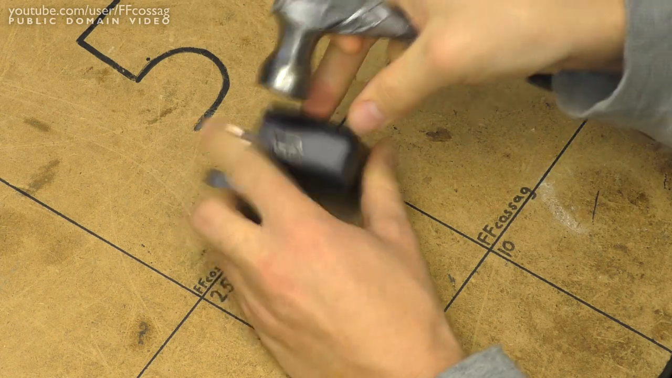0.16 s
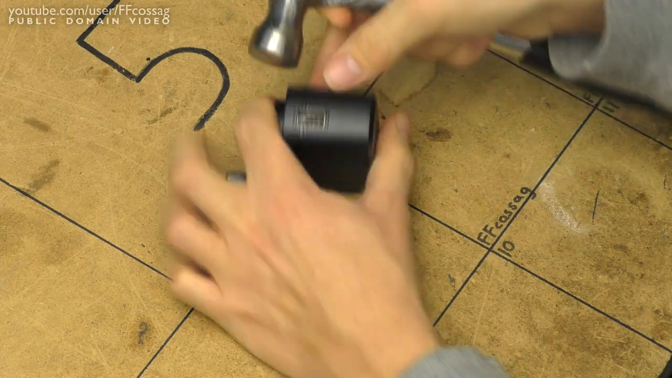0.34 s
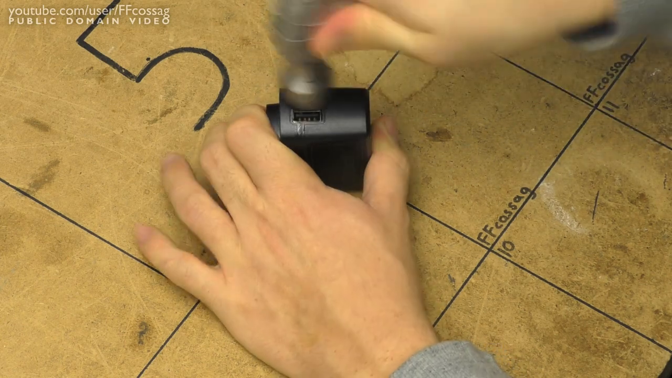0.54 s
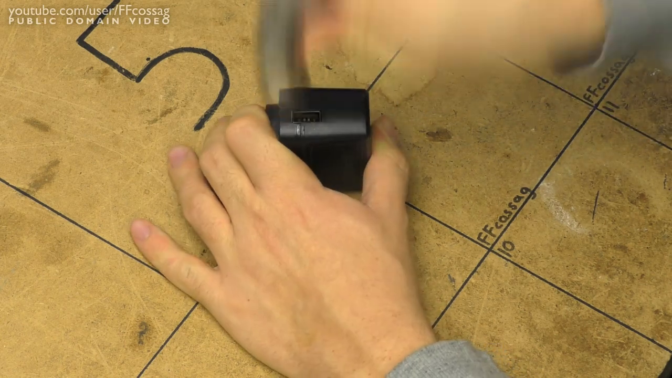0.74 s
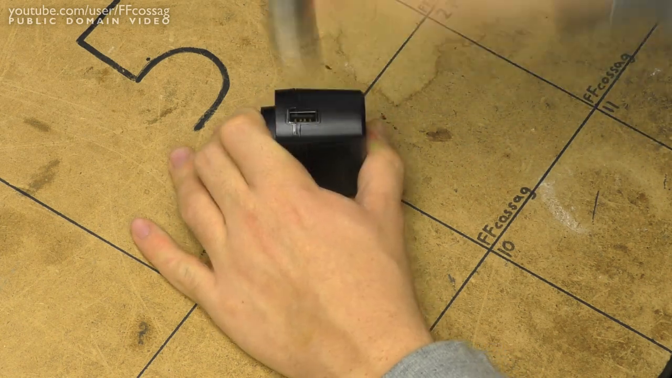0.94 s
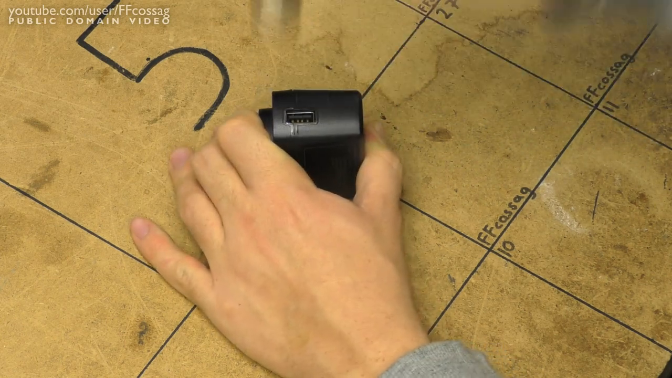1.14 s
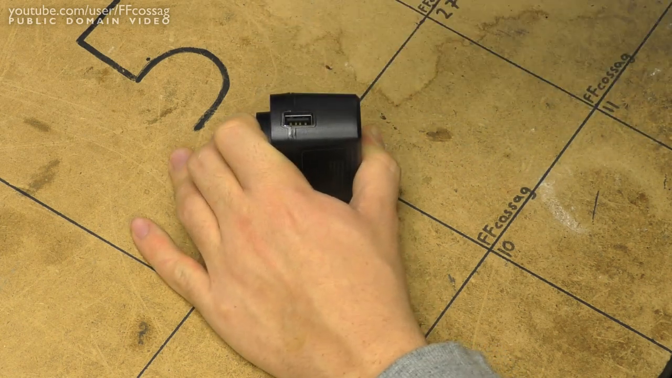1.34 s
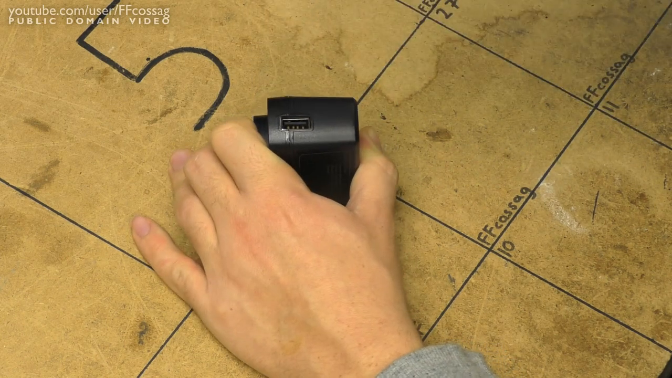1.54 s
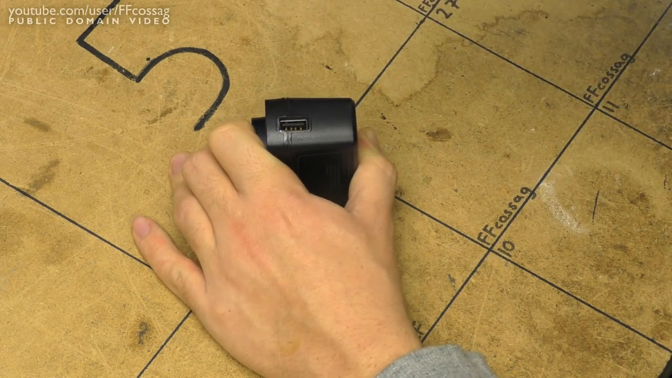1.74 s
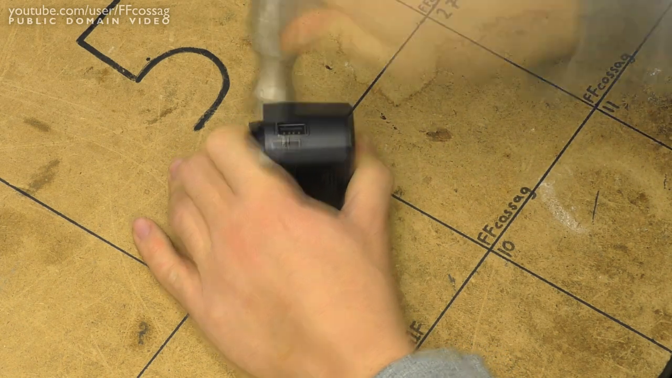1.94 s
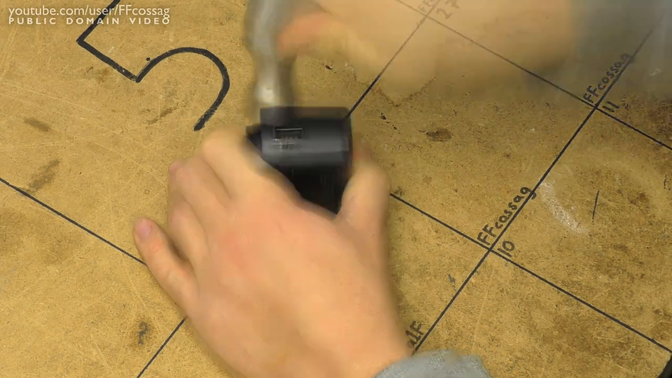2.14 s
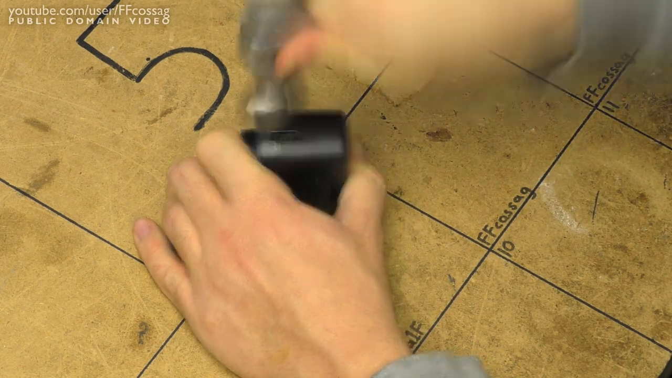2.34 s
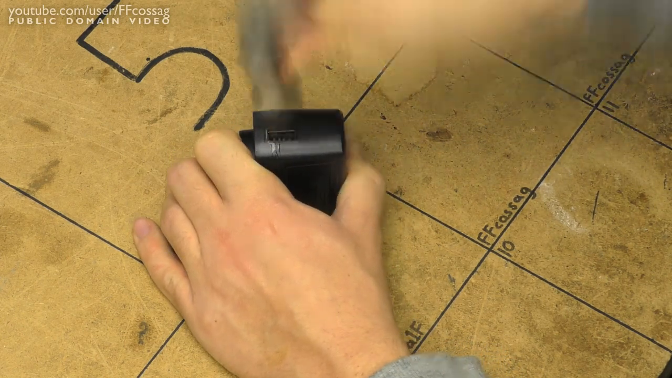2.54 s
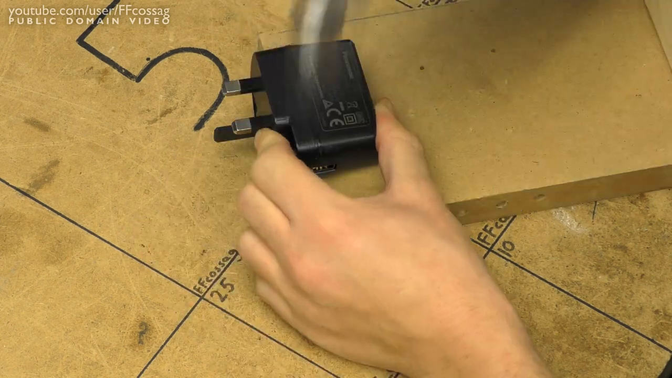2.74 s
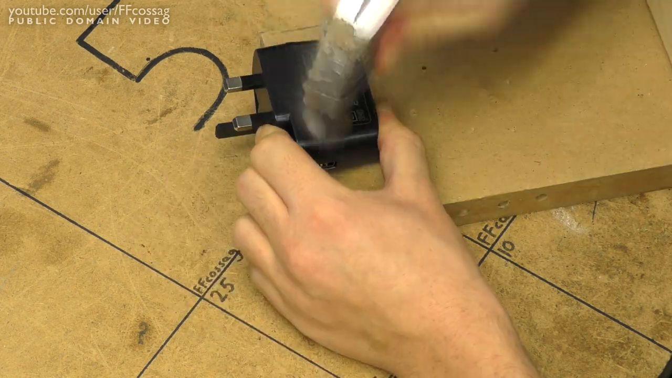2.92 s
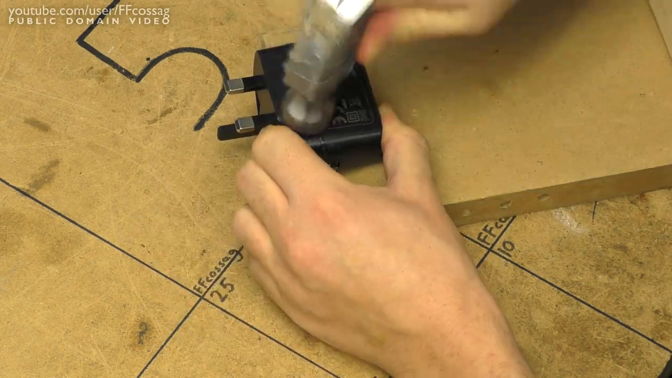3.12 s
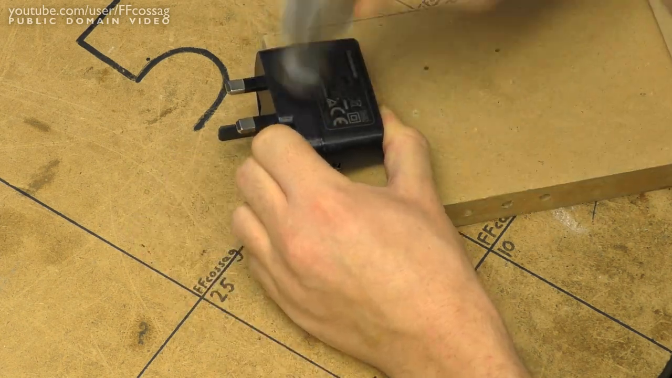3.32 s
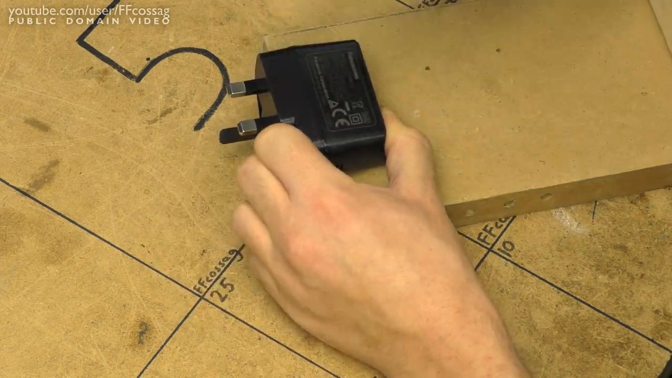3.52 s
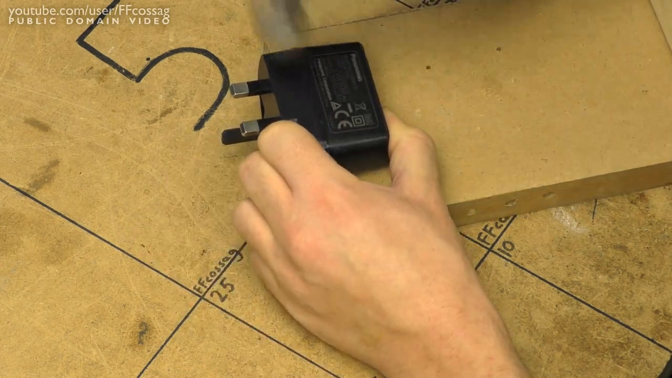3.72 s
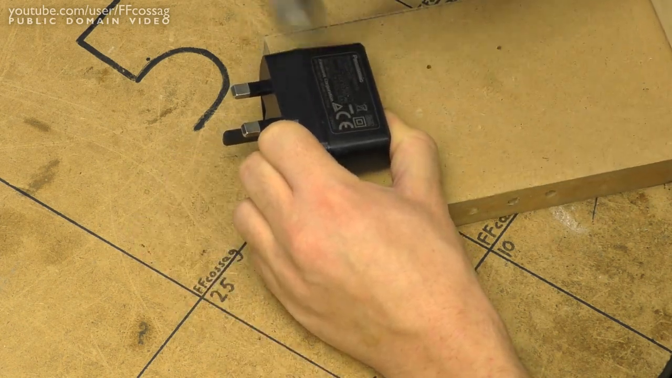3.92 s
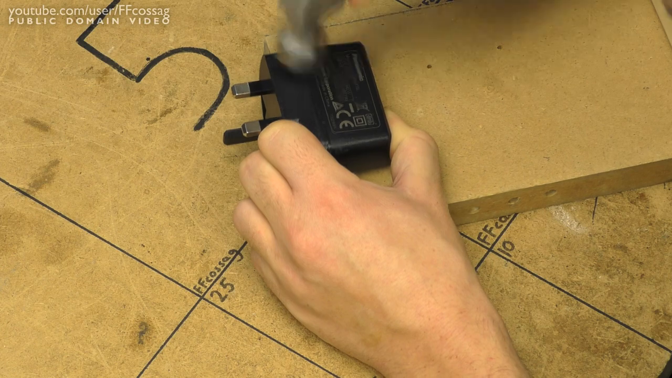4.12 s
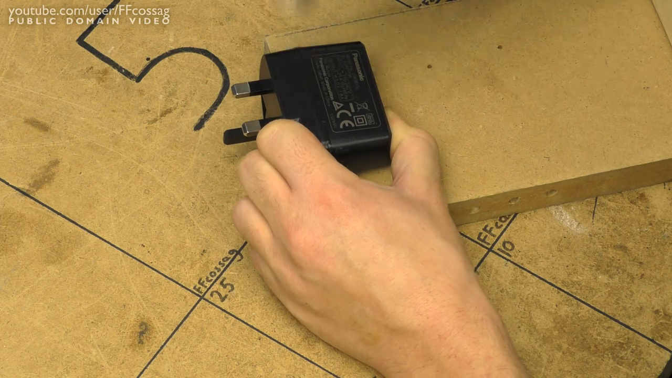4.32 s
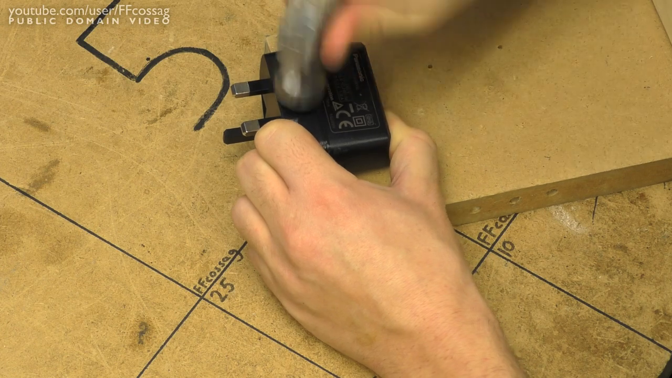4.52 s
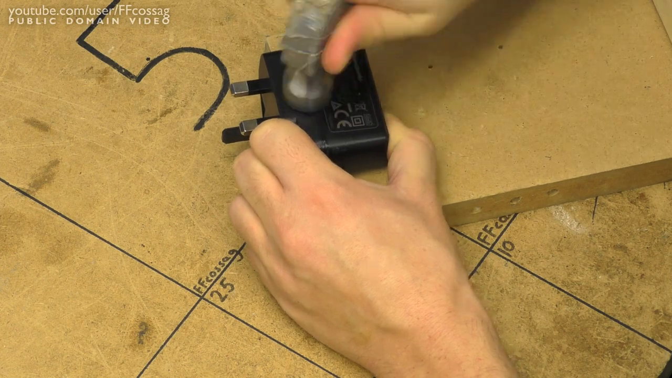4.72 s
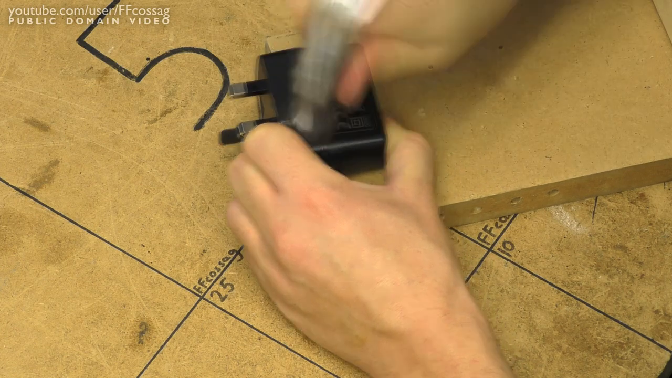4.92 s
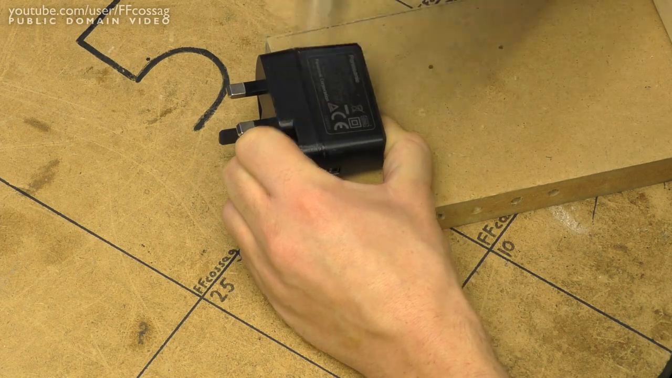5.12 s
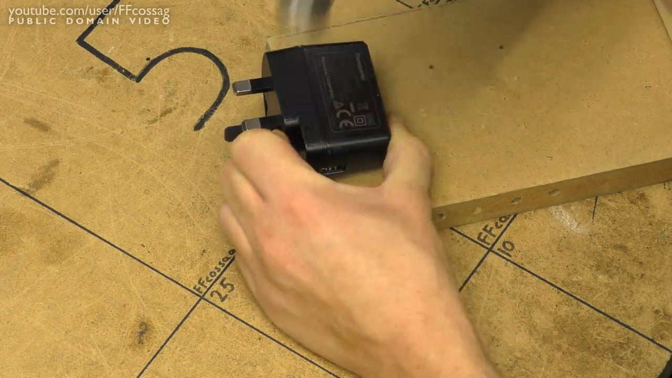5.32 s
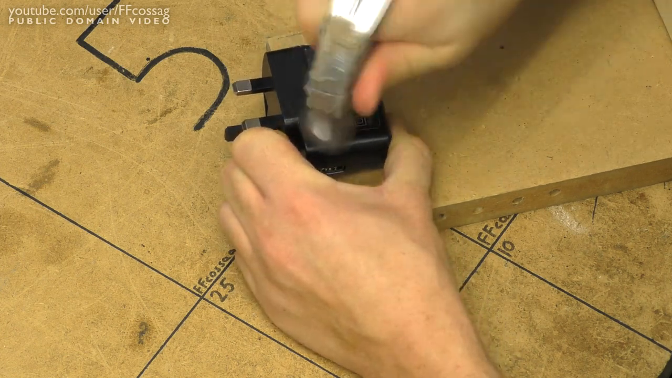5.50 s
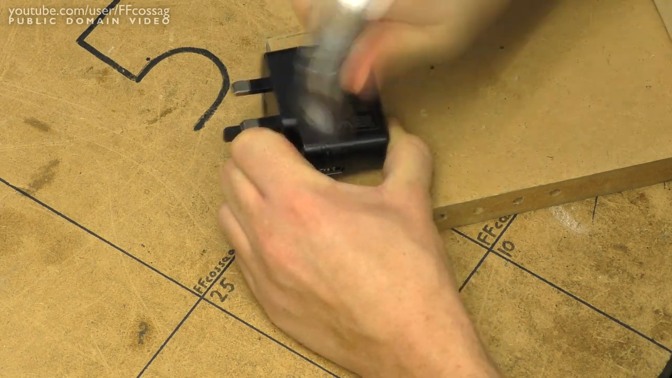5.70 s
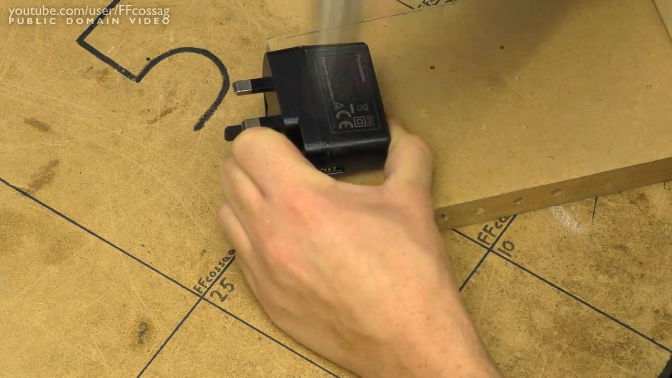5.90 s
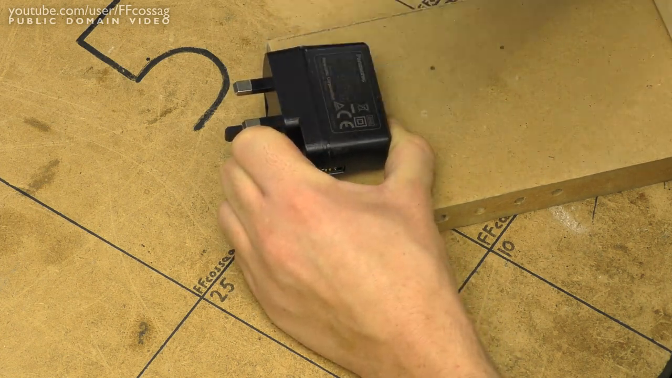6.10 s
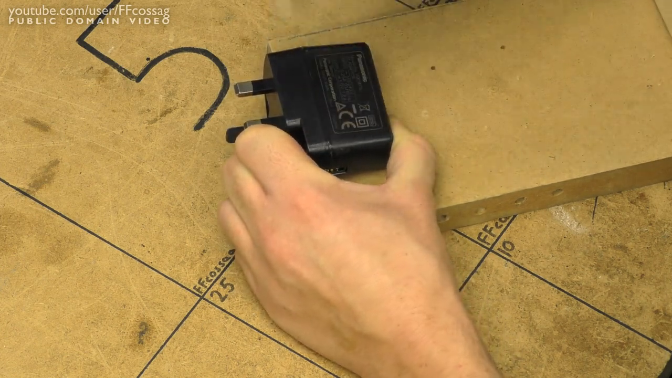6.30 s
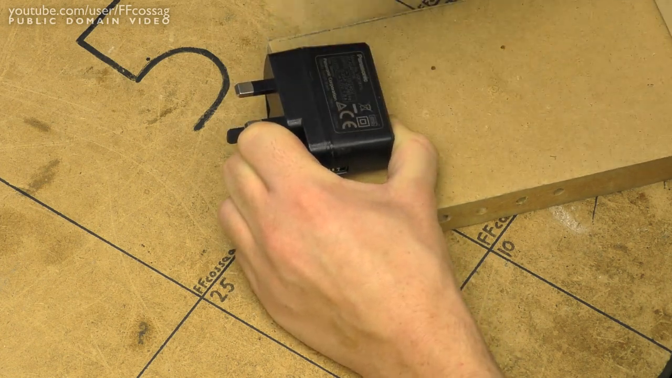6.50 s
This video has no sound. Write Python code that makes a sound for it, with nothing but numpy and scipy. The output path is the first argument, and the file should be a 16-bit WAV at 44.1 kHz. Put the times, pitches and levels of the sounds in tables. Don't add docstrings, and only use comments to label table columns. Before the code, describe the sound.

Rapid sped-up hammering on hollow hard plastic, about ten sharp blows a second, with woody thumps, loose rattle and brief pauses in a small room.

```python
import sys
import numpy as np
from scipy import signal
from scipy.fft import rfft, irfft
from scipy.io import wavfile
from scipy.ndimage import uniform_filter1d

SR = 44100
rng = np.random.default_rng(int(sys.argv[2]) if len(sys.argv) > 2 else 0)


def invert_db(level):
    return 10 ** (np.asarray(level, dtype=float) / 20)


def dump_mix(stems):
    frames = np.atleast_2d(stems).T
    limited = np.clip(frames, -1, 1)
    pcm = np.round(limited * 32767).astype(np.int16)
    wavfile.write(sys.argv[1], SR, pcm)


N = 288855

# f/Hz, level/dB, t60/s
CASE_MODES = [
    [(804, -28, 0.025), (1036, -26.5, 0.032), (1310, -25.5, 0.026), (600, -35, 0.035), (1590, -27, 0.013),
     (1826, -19.5, 0.0086), (2270, -20.5, 0.0091), (3180, -33.5, 0.024)],
    [(972, -31.5, 0.019), (1220, -32, 0.017), (1817, -28.5, 0.01), (2210, -35.5, 0.0083),
     (3034, -35, 0.028), (3695, -39, 0.025)],
]
# f/Hz, width/Hz, level/dB
CRACK_BANDS = [
    [(1450, 1200, -23.5), (5170, 1900, -30), (7940, 2000, -22.5), (13500, 2600, -33.5)],
    [(1150, 1000, -25), (3000, 1100, -26), (6850, 2130, -23.5), (12530, 2900, -35)],
]
BUZZ_SHARE = [.12, .22]
STEEL_HZ = [
    [7672, 815],
    [3720, 6900, 7610, 8650, 10050],
]
# level/dB, t60/s
STEEL_DECAY = [
    [(-64, .4), (-57, .4)],
    [(-50, .2), (-56, .2), (-58, .25), (-55, .18), (-55, .2)],
]
BENCH_HZ = [56, 119, 131, 177, 251, 305, 378, 555]
# level/dB, t60/s
BENCH_DECAY = [
    [(-40, 0.81), (-31, 0.42), (-40, 0.34), (-48, 0.7), (-43, 0.35), (-45, 0.55), (-41.5, 0.2), (-48, 0.12)],
    [(-39, 0.85), (-30, 0.52), (-37, 0.54), (-46, 0.7), (-45.5, 0.45), (-50, 0.6), (-44, 0.21),
     (-75.5, 0.092)],
]
# f/Hz, level/dB, t60/s
TOP_SHOVE = (155.4, -18, 0.029)
# f/Hz, width/Hz, level/dB
BOUNCE_BANDS = [(700, 650, -3), (1360, 450, -3), (1850, 630, -.5), (2500, 750, -6), (3900, 1800, -17),
                (7500, 4000, -21)]
# f/Hz, level/dB, t60/s
ROOM_DECAY = [(210, -37, 0.93), (645, -23.5, 0.13), (1500, -25, 0.12), (3000, -38, 0.2),
              (5000, -43.5, 0.17), (8000, -40.5, 0.13), (13000, -50, 0.07), (16100, -80, .04)]
# f/Hz, level/dB per Hz
AIR_SPECTRUM = [(15, -39), (25, 6.5), (65, 16.5), (202, 8.5), (266, 8.5), (902, -15), (1220, -8.5),
                (2820, -23.5), (7300, -31), (11300, -40.5), (13600, -45.5), (16500, -83)]
# t/s of the first copy, crack level/dB, share of the first copy (0-1),
# bench top level/dB, bounce level/dB
STANDING_BLOWS = [(-0.0025, -5.0, 0.38, 2.0, -5.5), (0.5465, -7.0, 0.35, 0.5, -10.0),
                  (0.6367, -4.5, 0.13, 7.0, -7.0), (0.7353, -5.0, 0.9, 7.5, -7.5),
                  (0.828, -0.5, 0.31, 3.5, -5.5), (0.9174, -4.5, 0.09, 1.5, -6.5),
                  (1.0155, -1.5, 0.14, 4.0, -5.5), (1.1203, -2.5, 0.9, 5.5, -4.5),
                  (1.2062, -4.5, 0.11, -0.5, -8.5), (1.3139, -3.0, 0.73, 1.5, -6.5),
                  (1.4057, -3.5, 0.17, 2.5, -4.5), (1.5023, -1.0, 0.18, 4.0, -7.5),
                  (1.6059, -2.5, 0.57, 0.5, -8.0), (1.7056, -4.5, 0.82, 2.5, -6.5),
                  (1.793, -1.5, 0.34, 4.0, -5.5), (1.8868, -2.0, 0.21, -2.0, -5.5),
                  (1.991, -3.5, 0.93, -1.5, -7.5), (2.0863, -3.5, 0.65, 3.5, -6.0),
                  (2.191, -1.0, 0.98, -3.5, -8.0), (2.2846, -3.0, 0.95, 2.5, -11.0),
                  (2.3643, -3.5, 0.14, 3.0, -2.0), (2.4598, -0.5, 0.14, -1.0, -18.5),
                  (2.556, -3.5, 0.15, 2.0, -11.5)]
FLAT_BLOWS = [(2.7947, -4.0, 0.29, -1.0, 1.0), (2.9022, -1.0, 0.11, 1.0, 8.5),
              (3.0158, -3.5, 0.15, 3.5, 9.0), (3.1297, -3.0, 0.24, 0.0, 4.5),
              (3.2554, -3.0, 0.93, 2.5, 3.0), (3.3553, -0.5, 0.11, -4.0, 6.5),
              (3.4774, -0.5, 0.59, 6.5, 5.5), (3.5931, -2.0, 0.81, 4.0, 6.0), (3.7042, -2.0, 0.4, 7.0, 2.5),
              (3.8306, -1.5, 0.93, 2.0, 9.5), (3.9349, -1.0, 0.48, -3.0, 0.0),
              (4.0516, -2.0, 0.77, 3.5, 2.0), (4.1483, -1.5, 0.08, 4.0, -0.5)]
LAST_FLAT_BLOWS = [(4.405, -2.0, 0.86, 4.5, 6.5), (4.5156, -0.5, 0.8, -5.5, 1.0),
                   (4.624, -0.5, 0.31, 0.5, 3.0), (4.7319, -1.0, 0.12, 0.0, 8.5),
                   (4.8506, -1.5, 0.42, -1.0, 4.5), (4.9546, -2.5, 0.1, -7.5, 3.0),
                   (5.0631, -5.0, 0.15, -5.5, 4.0), (5.1807, -1.0, 0.35, -3.0, 2.5),
                   (5.287, 0.5, 0.16, -2.5, 8.5), (5.3967, -1.5, 0.08, 0.0, 6.0),
                   (5.505, 0.0, 0.14, -1.5, 8.0), (5.63, 0.5, 0.98, -0.5, 10.5),
                   (5.74, -1.0, 0.94, -1.5, -4.0), (5.8407, -1.0, 0.66, 2.0, 2.0),
                   (5.951, -0.5, 0.24, -2.5, 1.0), (6.0633, 1.0, 0.28, 2.0, 1.0),
                   (6.17, -2.5, 0.26, -2.5, 3.5), (6.2916, -1.0, 0.82, -4.0, 3.5),
                   (6.372, -2.0, 0.47, -0.5, -5.0), (6.4395, -3.0, 0.76, 0.0, -2.0),
                   (6.5005, -3.0, 0.81, -6.5, 1.5)]
# legs level/dB at the start, legs drift/dB per s, steel level/dB, bounce delay/s
RUN_SETTINGS = [
    (2.5, -.8, -2.5, .105),
    (6, -6, 1.5, .085),
    (11, -6, 1, .082),
]
# t/s, level/dB, f/Hz, length/s
FINGER_KNOCKS = [(.112, -54, 600, .02), (.1295, -31, 430, .008), (.13, -42, 1400, .01),
                 (.137, -38, 330, .02), (.15, -47, 170, .045), (.197, -49, 280, .025),
                 (.203, -64, 1300, .015), (.274, -66, 1600, .013), (.391, -66.5, 1210, .04),
                 (3.622, -41, 1500, .005), (4.2, -60, 160, .07), (4.332, -59, 2600, .004),
                 (5.91, -44, 1800, .018)]
# t/s, level/dB, f/Hz,
# length/s
PRONG_TICKS = [(.148, -60, 8000, .004), (.193, -75, 6300, .026), (.272, -69, 7550, .004),
               (.364, -73, 6960, .05), (2.028, -64, 7400, .03), (2.061, -60, 7400, .004),
               (2.666, -74, 6900, .03), (2.7, -77, 7450, .021), (2.749, -62, 5670, .003),
               (4.2, -71, 5000, .09), (4.332, -66, 7500, .003), (4.253, -66, 8000, .008),
               (4.269, -56.5, 7000, .006), (4.286, -66, 6500, .006), (4.6, -60, 7000, .025),
               (5.276, -52, 6000, .025), (5.907, -44, 6000, .02)]

HOP = 706
RING = 20 * HOP
SLICE = .84
OVERLOAD_DB = -25
SURGE_DB, SURGE_S = 7, .0025
HIT_COLOUR_DB = 1.5
BOUNCE_DB, BOUNCE_S = -59.5, .034
LEAD_IN = 1.5
FLIGHT_S_PER_DB = .002
SWAY_BUILD_DB, SWAY_BUILD_S, SWAY_RISE_S = -4.5, .12, .025
KNOCK_WIDTH, TICK_WIDTH = 1.0, .6
AIR_DB, STIR_DB, SETTLE_S = -55.5, 6, .15
HISS_DB, DUCK_DB, RECOVER_S = -78, -10, .12


def hammering():
    mix = np.zeros(N + RING)
    noise = rng.standard_normal(N + 2 * RING)
    rattle = sum(invert_db(db) * resonate(np.roll(noise, round(hz)), hz, width)
                 for hz, width, db in BOUNCE_BANDS)
    rattles = [1.4 * uniform_filter1d(rattle, size=14), rattle]
    runs = (STANDING_BLOWS, FLAT_BLOWS, LAST_FLAT_BLOWS)
    for k, (blows, (legs_db, drift, steel_db, delay)) in enumerate(zip(runs, RUN_SETTINGS)):
        flat = min(k, 1)
        for s, crack_db, share, top_db, bounce_db in blows:
            since = s - blows[0][0]
            sway_db = legs_db + drift * since + SWAY_BUILD_DB * np.exp(-since / SWAY_BUILD_S)
            bounce_s = delay + FLIGHT_S_PER_DB * bounce_db
            own_rattle = rattles[flat][RING + round(s * SR):][:RING]
            sound = blow(flat, own_rattle, crack_db, top_db, sway_db, bounce_s, bounce_db, steel_db)
            add(mix, s - 2 * HOP / SR, speed_up(sound, share))
    return mix[RING:]


def blow(flat, rattle, crack_db, top_db, legs_db, bounce_s, bounce_db, steel_db):
    t = np.arange(RING) / SR
    noise, stray = rng.standard_normal((3, RING)), rng.standard_normal((4, 2, 8))
    near = reflections(t, noise[1])
    near[:5 * HOP] += case_body(flat, t[:5 * HOP], stray[0])
    near[:HOP] += crack(flat, t[:HOP], noise[0, :HOP], stray[3, 0])
    pressure = invert_db(crack_db) * near + bench(flat, t, stray[1], legs_db, top_db)
    pressure += rattle * chatter(t, noise[2], bounce_s, bounce_db)
    pressure += invert_db(steel_db) * steel(flat, t, stray[2])
    pressure *= invert_db(SURGE_DB * np.exp(-t / SURGE_S))
    pressure[-HOP:] *= np.linspace(1, 0, HOP)
    return np.clip(pressure, -invert_db(OVERLOAD_DB), invert_db(OVERLOAD_DB))


def crack(flat, t, noise, colour):
    contact = np.exp(-(t / .0017) ** 2) + BUZZ_SHARE[flat] * np.exp(-t / .006)
    bands = sum(invert_db(db + HIT_COLOUR_DB * c) * resonate(noise, hz, width)
                for (hz, width, db), c in zip(CRACK_BANDS[flat], colour))
    return bands * contact


def case_body(flat, t, stray):
    modes = np.array(CASE_MODES[flat])
    return ring(modes[:, 0], modes[:, 1:], t, stray * [[3], [1.5]]).sum(0)


def bench(flat, t, stray, legs_db, top_db):
    legs, *top = ring(BENCH_HZ, BENCH_DECAY[flat], t, stray * [[3], [1.5]], start=2.2)
    sound = invert_db(legs_db) * legs * (1 - np.exp(-t / SWAY_RISE_S))
    sound += invert_db(top_db) * sum(top) * (1 - np.exp(-t / 0.0027))
    early = t[:5 * HOP]
    shove = ring(TOP_SHOVE[:1], [TOP_SHOVE[1:]], early, stray * [[5], [1]], start=.5)[0]
    sound[:5 * HOP] += shove * (1 - np.exp(-early / .0004))
    return sound


def chatter(t, noise, bounce_s, bounce_db):
    spread = BOUNCE_S * np.where(t < bounce_s, LEAD_IN, 1)
    uneven_db = 3.0 * evened(uniform_filter1d(noise, 150))
    return np.exp(-((t - bounce_s) / spread) ** 2) * invert_db(BOUNCE_DB + bounce_db + uneven_db)


def steel(flat, t, stray):
    tones = ring(STEEL_HZ[flat], STEEL_DECAY[flat], t, stray * [[.3 * flat], [2 + 3 * flat]])
    return tones.sum(0) * (1 - np.exp(-t / (.03 + .03 * flat))) ** 2


def reflections(t, noise):
    hz, frame_s, z = signal.stft(noise, SR, nperseg=256)
    db = read([row[:2] for row in ROOM_DECAY], hz)[:, None]
    t60 = read([row[::2] for row in ROOM_DECAY], hz)[:, None]
    fade = invert_db(db - 60 * (frame_s / t60) ** 1.125)
    tail = signal.istft(z * fade, SR, nperseg=256)[1][:len(t)]
    return tail * (1 - np.exp(-t / 0.0014))


def speed_up(sound, share):
    share = np.clip(share, .02, .97)
    place = round(HOP * (9 + SLICE ** 2 / 2 * np.log(share / (1 - share))))
    padded = np.concatenate([np.zeros(place), sound, np.zeros(8 * HOP)])
    bell = signal.windows.gaussian(8 * HOP, SLICE * HOP)
    out = np.zeros(len(padded))
    for k in range(len(padded) // (2 * HOP) - 3):
        out[k * HOP:(k + 8) * HOP] += bell * padded[2 * k * HOP:(2 * k + 8) * HOP]
    return out[place - 5 * HOP:]


def handling():
    mix = np.zeros(N + RING)
    for rows, width in ((FINGER_KNOCKS, KNOCK_WIDTH), (PRONG_TICKS, TICK_WIDTH)):
        for s, db, hz, length in rows:
            u = np.arange(9000) / SR / length
            noise = rng.standard_normal((2, 9000))
            grain = invert_db(1.43 * evened(uniform_filter1d(noise[1], 60)))
            swell = 5.2 * u * np.exp(-2.5 * u)
            add(mix, s, invert_db(db) * resonate(noise[0], hz, width * hz) * grain * swell)
    return mix[RING:]


def room_tone():
    hz = np.fft.rfftfreq(N, 1 / SR)
    air = evened(irfft(rfft(rng.standard_normal(N)) * invert_db(read(AIR_SPECTRUM, hz)), N))
    return air * invert_db(AIR_DB - STIR_DB - 1 + STIR_DB * afterglow(SETTLE_S))


def hiss():
    return resonate(rng.standard_normal(N), 5000, 9600) * invert_db(HISS_DB + DUCK_DB * afterglow(RECOVER_S))


def afterglow(fade_s):
    t = np.arange(N) / SR
    starts = np.array([row[0] for row in STANDING_BLOWS + FLAT_BLOWS + LAST_FLAT_BLOWS])
    since = t - starts[np.searchsorted(starts, t) - 1]
    return np.exp(-(since / fade_s) ** 2)


def ring(hz, modes, t, stray, start=1.0):
    hz = np.array(hz)[:, None]
    db, t60 = np.transpose(modes)[:, :, None]
    pitch, level = stray[:2, :len(hz), None]
    return invert_db(db + level - 60 * t / t60) * np.cos(2 * np.pi * hz * (1 + pitch / 100) * t - start)


def resonate(x, hz, width):
    edges = np.clip([hz - width / 2, hz + width / 2], 30, 19000)
    return evened(signal.sosfilt(signal.butter(2, edges, "band", fs=SR, output="sos"), x))


def evened(x):
    return x / np.sqrt(np.mean(x ** 2) + 1e-20)


def read(points, hz):
    f, value = np.transpose(points)
    return np.interp(np.log(hz + 1), np.log(f + 1), value)


def add(mix, s, sound):
    part = mix[RING + round(s * SR):][:len(sound)]
    part += sound[:len(part)]


def scene():
    return (hammering() + handling() + room_tone() + hiss())[None]


def band_limit(x):
    return signal.sosfilt(signal.butter(12, 16820, fs=SR, output="sos"), x)


def record(dry):
    cut = signal.sosfilt(signal.butter(2, 24, "high", fs=SR, output="sos"), dry)
    cut = signal.oaconvolve(cut, signal.firwin(255, 16000, fs=SR)[None], "same")
    return band_limit(cut)


dry = scene()
out = record(dry)
dump_mix(out)
```